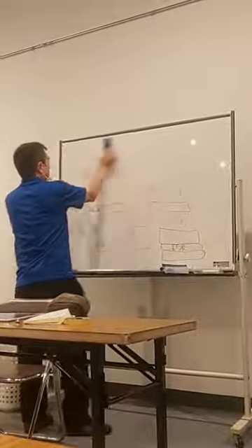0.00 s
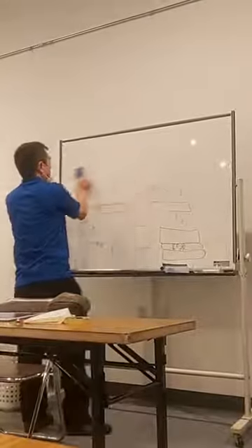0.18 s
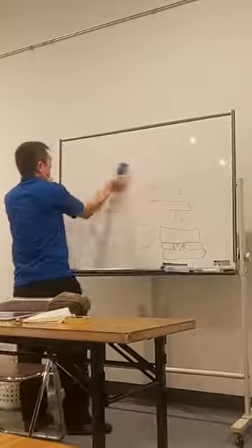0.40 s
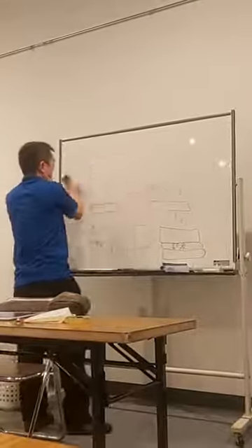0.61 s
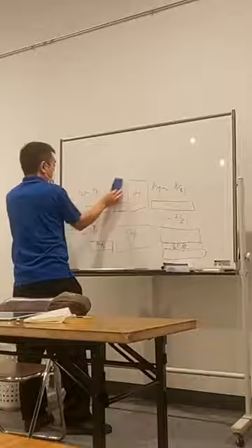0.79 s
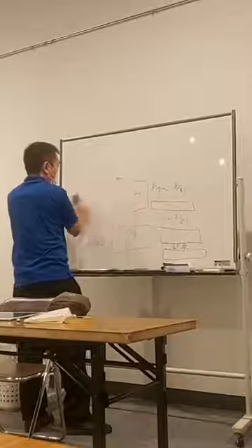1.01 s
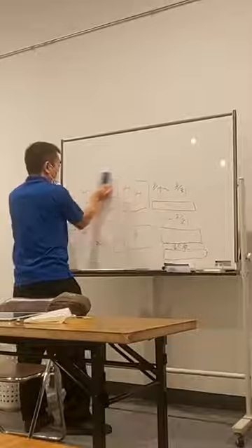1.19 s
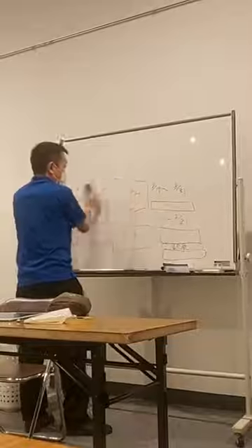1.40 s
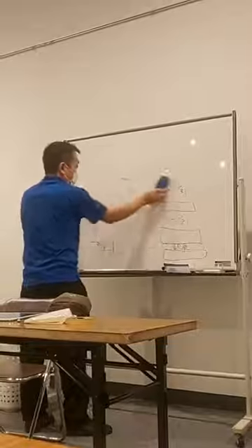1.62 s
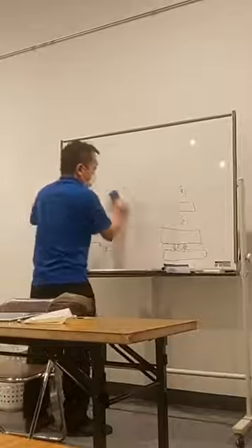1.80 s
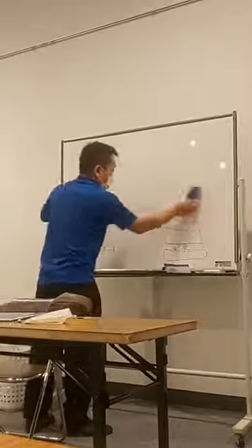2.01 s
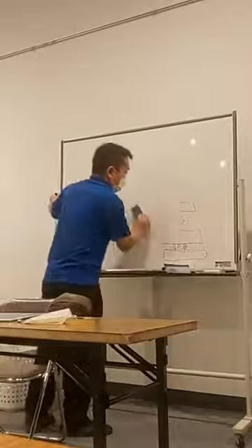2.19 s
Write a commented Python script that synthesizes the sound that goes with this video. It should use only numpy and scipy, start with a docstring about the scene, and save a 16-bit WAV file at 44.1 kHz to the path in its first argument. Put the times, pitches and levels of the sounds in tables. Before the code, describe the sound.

A whiteboard eraser squeaks as it rubs back and forth. Over soft, fluctuating felt hiss, thin, raspy, very high squeals of about a tenth of a second or less come near 0.2, 0.6, 0.95 and 1.3 seconds, the first dropping in pitch. Light knocks fall around 0.75, 0.9 and 2.1. After 1.4 only rubbing and faint chirps remain. The bare room rings briefly over low ventilation rumble.

```python
"""In a quiet meeting room an eraser is rubbed back and forth over a whiteboard.
The felt is coloured noise whose level rises and falls; it catches in short squeals, mostly near 9 kHz, made of
trembling sines that beat and rasp as they roughen. Faint chirps, bright scratches and low bumps join in.
Light knocks are decaying sines and a noise tick. Squeals, chirps, scratches and knocks ring on in the bare room;
ventilation rumbles, hums and hisses."""
import sys
import numpy as np
from scipy import signal
from scipy.fft import rfft, irfft, next_fast_len
from scipy.io import wavfile

SR = 44100
rng = np.random.default_rng(int(sys.argv[2]) if len(sys.argv) > 2 else 0)


def output_pcm(signal):
    """Save a mono or channel-first signal as 16-bit PCM at the path in sys.argv[1].

    Samples are clipped to [-1, 1] before scaling.
    """
    pcm = np.clip(np.atleast_2d(signal).T, -1, 1) * 32767
    wavfile.write(sys.argv[1], SR, np.round(pcm).astype(np.int16))


N = 97020
LEAD_S = 0.2   # computed ahead of the audible part, so the room is already sounding
TIME = np.arange(-int(LEAD_S * SR), N) / SR


def from_db(db):
    """Level in dB to amplitude factor."""
    return 10 ** (np.asarray(db) / 20)


def rms_one(x):
    """Scale a signal to rms 1."""
    return x / np.sqrt(np.mean(x ** 2) + 1e-20)


def drift(rate_hz):
    """Slow random wander: white noise through two equal one-pole lowpasses, rms 1."""
    pole = np.exp(-2 * np.pi * rate_hz / SR)
    white = rng.standard_normal(len(TIME) + SR)
    wander = signal.lfilter([1], [1, -2 * pole, pole * pole], white)
    return rms_one(wander[SR:])   # drop the filter's first second


def noise(spectrum):
    """Noise shaped by (Hz, dB per Hz) points, falling away past both ends; rms 1."""
    hz, db = np.transpose(spectrum)
    size = next_fast_len(len(TIME))
    f = np.maximum(np.fft.rfftfreq(size, 1 / SR), 1)
    colour = from_db(np.interp(np.log(f), np.log(hz), db))
    low_end = np.minimum(1, f / hz[0]) ** 2
    high_end = np.minimum(1, hz[-1] / f) ** 2
    white = rfft(rng.standard_normal(size))
    return rms_one(irfft(white * colour * low_end * high_end, size)[:len(TIME)])


def level_curve(points):
    """Join (seconds, level) points with straight lines."""
    return np.interp(TIME, *np.transpose(points))


def swell(start, length):
    """A rounded rise and fall of height 1."""
    return np.sin(np.pi * np.clip((TIME - start) / length, 0, 1))


def tone(pitch_hz, jitter_hz):
    """A sine whose pitch trembles at random, by no more than the jitter either way; rms 1."""
    jitter_rate_hz = 190
    pitch = pitch_hz + jitter_hz * np.tanh(drift(jitter_rate_hz))
    return np.sqrt(2) * np.sin(2 * np.pi * np.cumsum(pitch) / SR)


def squeals():
    """Stick-slip tones: with roughness the pitch trembles, a second patch of felt beats and a rasp grows."""
    # One curve per squeal; the first stroke starts high and breaks to a lower note.
    # Each row: time in seconds, pitch in Hz, level in dB before the mix, roughness (about 0 to 1).
    squeal_curves = [
        [(.195, 10000, -36, 0.26), (.2, 9910, -26.5, 0.37), (.215, 9925, -29.5, 0.65), (.226, 9700, -48, 0.8)],
        [(.209, 9360, -39, 1), (.226, 9164, -29.5, 1.11), (.24, 9016, -29.5, 0.35), (.252, 9070, -29.5, 0.34),
         (.264, 9050, -43, 0)],
        [(.536, 9130, -45, 0.15), (.546, 9230, -38, 0.2), (.554, 9160, -31, 0.21), (.567, 9240, -37, 0.4),
         (.582, 9350, -33.5, 0.48), (.602, 9115, -30, 0.61), (.62, 9146, -30, 0.66), (.642, 8893, -34, 0.46),
         (.658, 9010, -46, .4)],
        [(.909, 9000, -41.5, 0.06), (.928, 9220, -37.5, 0.11), (.943, 9190, -44, 0.31), (.949, 9310, -32, 0.66),
         (.96, 9210, -35.5, 0.98), (.968, 9217, -27.5, 0.87), (.992, 9076, -32, 0.44), (1.008, 8910, -40, 0.4)],
        [(1.247, 9190, -38, 0.19), (1.263, 9260, -37, 0.39), (1.275, 9440, -36.5, 0.53),
         (1.287, 9324, -27, .85), (1.303, 9240, -29.5, .7), (1.32, 9010, -32.5, 0.6), (1.35, 9140, -38, 0.5)],
    ]
    # Friction noise around the squeal. Each row: frequency in Hz, relative level in dB per Hz.
    rasp_colour = [(8200, -28.5), (8650, -15), (8900, 4.5), (9450, 9.5), (9700, 7), (10000, -15.5),
                   (10250, -34), (11200, -63), (11700, -51)]
    edge_s = 0.0044   # the felt catches and lets go this fast
    # At roughness 1: pitch tremble, the second patch's offset above the first, and both added levels.
    jitter_hz, second_offset_hz, second_db, rasp_db = 172, 173.3, -16, -10

    out, rasp = np.zeros(len(TIME)), noise(rasp_colour)
    for curve in squeal_curves:
        s, *columns = np.transpose(curve)
        pitch, db, rough = (np.interp(TIME, s, column) for column in columns)
        gate = np.clip(np.minimum(TIME - s[0], s[-1] - TIME) / edge_s, 0, 1)
        first = tone(pitch, rough * jitter_hz)
        second = tone(pitch + rough * second_offset_hz, rough * jitter_hz)
        body = first + rough * from_db(second_db) * second
        body += rough ** 2 * from_db(rasp_db) * rasp
        out += gate * from_db(db) * body
    return out


def chirps():
    """Faint, nearly steady whistles where the felt only just catches."""
    # Each row: start in seconds, length in seconds, level in dB before the mix, pitch in Hz.
    chirp_events = [(-.05, 0.065, -50, 9222), (0.065, 0.033, -62, 9240), (0.207, 0.048, -70, 4580),
                    (0.56, 0.041, -66.5, 4610), (0.696, 0.047, -65, 4550), (1.166, 0.033, -68, 4750),
                    (1.777, 0.039, -58, 7125), (1.746, .12, -72, 13700)]
    jitter_hz = 75.6
    return sum(from_db(db) * swell(start, length) * tone(hz, jitter_hz)
               for start, length, db, hz in chirp_events)


def scrapes():
    """A bright scratch of band-shaped noise as the felt grabs the board."""
    # Each row: start in seconds, length in seconds, level in dB before the mix.
    scrape_events = [(0.167, .035, -58.5), (0.19, 0.025, -42.5), (0.933, 0.029, -58), (1.255, 0.03, -53)]
    # Colour of the scratch. Each row: frequency in Hz, relative level in dB per Hz.
    scrape_colour = [(9500, -27), (10200, 10.5), (10700, -2), (11250, -1.5), (11550, -28), (12500, -40)]
    envelope = sum(from_db(db) * swell(start, length) for start, length, db in scrape_events)
    return envelope * noise(scrape_colour)


def rubbing():
    """Grainy friction hiss of felt over the hollow rub of the panel, sharing one random flutter."""
    # Felt rubbing on the board. Each row: time in seconds, level in dB.
    felt_level = [(0, -62), (.08, -61.5), (.16, -63), (.215, -59), (.27, -64), (.34, -63.5), (.43, -62.5),
                  (.52, -65), (.59, -61.5), (.67, -64.5), (.76, -61), (.86, -62.5), (.95, -63),
                  (1.01, -61.5), (1.1, -63), (1.18, -60), (1.23, -62.5), (1.32, -61.5), (1.375, -57.5),
                  (1.46, -61.5), (1.68, -64.5), (1.82, -65), (1.87, -62.5), (1.96, -61), (2.04, -65),
                  (2.14, -63), (2.2, -64.5)]
    # Colour of the felt. Each row: frequency in Hz, relative level in dB per Hz.
    felt_colour = [(500, -0.5), (1500, -6.5), (2200, -9), (2800, -5), (3500, -3.5), (4050, 2), (4600, -2.5),
                   (5550, 8.5), (6200, 0.5), (6800, -11), (8000, -9), (10000, -3), (12400, -3),
                   (13400, -10.5), (14300, -30)]
    # The board's own resonance under the felt. Each row: time in seconds, level in dB.
    panel_level = [(0, -66.5), (.08, -65.5), (.15, -71), (.24, -66), (.36, -70.5), (.5, -69), (.68, -74),
                   (.8, -68.5), (.88, -68), (1.0, -73.5), (1.12, -68.5), (1.18, -64.5), (1.26, -71.5),
                   (1.38, -68.5), (1.46, -70.5), (1.75, -76), (2.2, -73.5)]
    # Colour of the panel. Each row: frequency in Hz, relative level in dB per Hz.
    panel_colour = [(300, 0.5), (750, -11), (1050, -0.5), (1300, 2), (1580, 6.5), (1800, -0.5), (2050, -12),
                    (3000, -20)]

    grain_depth_db, grain_rate_hz = 0.95, 21
    grain_db = grain_depth_db * drift(grain_rate_hz)
    felt = from_db(level_curve(felt_level) + grain_db) * noise(felt_colour)
    panel = from_db(level_curve(panel_level) + grain_db) * noise(panel_colour)
    return felt + panel


def flexing():
    """The board flexes under the hand: faint low bumps of noise."""
    # Each row: centre in seconds, level in dB.
    bumps = [(0.02, -58.5), (1.14, -60.5), (1.55, -62)]
    # Colour of the bumps. Each row: frequency in Hz, relative level in dB per Hz.
    bump_colour = [(32, -26), (45, -20), (70, -17), (100, 3), (140, -4.5), (250, -25.5)]
    half_length_s = 0.05
    envelope = sum(from_db(db) * np.exp(-((TIME - s) / half_length_s) ** 2) for s, db in bumps)
    return envelope * noise(bump_colour)


def knocks():
    """Light blows: a tock from the damped board's modes, a tick and a short ring from the eraser's shell."""
    # The eraser knocks on the board. Each row: start in seconds, tock, tick and ring levels in dB.
    knock_events = [(0.067, -64, -61, -56), (0.751, -55.5, -57, -68), (0.911, -50.5, -54.5, -62),
                    (1.138, -65, -64, -72), (2.124, -60, -53, -68)]
    # Modes of the board. Each row: frequency in Hz, level in dB relative to the tock, t60 in seconds.
    board_modes = [(400, -12, .04), (990, -2, .04), (1110, -3, .03), (1270, -3, .03), (1420, 0, .025),
                   (1620, -2, .028)]
    # Tick of the eraser's shell. Each row: frequency in Hz, relative level in dB per Hz.
    shell_colour = [(2000, -20), (3200, -9), (4200, 1), (5000, -4), (6300, -1), (7500, -8), (13000, -16)]
    contact_s, tick_t60_s = 0.00063, 0.015   # rise and decay of the tick
    ring_hz, ring_t60_s = 4215, 0.058

    out, tick = np.zeros(len(TIME)), noise(shell_colour)
    for start, tock_db, tick_db, ring_db in knock_events:
        age = np.maximum(TIME - start, 0)
        for k, (hz, db, t60) in enumerate(board_modes):
            sign = (-1) ** k   # neighbouring modes start in opposite directions
            out += sign * from_db(tock_db + db - 60 * age / t60) * np.sin(2 * np.pi * hz * age)
        rise = np.minimum(age / contact_s, 1)
        out += rise * from_db(tick_db - 60 * age / tick_t60_s) * tick
        out += from_db(ring_db - 60 * age / ring_t60_s) * np.sin(2 * np.pi * ring_hz * age)
    return out


def room(x):
    """Sparse early reflections off the hard walls and a smooth, longer noise tail, both decaying."""
    early_t60_s, late_t60_s, first_echo_s = 0.28, 0.65, 0.00092
    early_db, late_db, reflections_per_s = -2.5, -7.5, 900
    t = np.arange(SR) / SR
    early = rng.standard_normal(SR) * (rng.random(SR) < reflections_per_s / SR)
    early *= from_db(-60 * t / early_t60_s) * (t > first_echo_s)
    late = rng.standard_normal(SR) * from_db(-60 * t / late_t60_s) * (t > 2 * first_echo_s)
    response = from_db(early_db) * early / np.linalg.norm(early)
    response += from_db(late_db) * late / np.linalg.norm(late)
    return signal.fftconvolve(x, response)[:len(x)]


def ventilation():
    """Low rumble and faint hiss of shaped noise, with hum tones whose phases waver."""
    # Rumble of the air. Each row: frequency in Hz, relative level in dB per Hz.
    air_colour = [(30, -2), (42, -7), (58, 3.5), (85, 0), (115, -2), (150, -6.5), (195, -4), (290, -10),
                  (370, -18), (500, -19.5), (730, -34.5), (900, -26.5)]
    # Hum tones. Each row: frequency in Hz, level in dB.
    hum_tones = [(68, -75.5), (100, -65), (199, -74.5)]
    # Hiss of the air. Each row: frequency in Hz, relative level in dB per Hz.
    hiss_colour = [(200, 2), (900, -3), (1600, -0.5), (2200, -14.5), (6000, -7), (14000, -34)]
    rumble_db, hiss_db = -61.5, -75
    waver_rad, waver_rate_hz = 0.94, 3.16

    hum = np.zeros(len(TIME))
    for hz, db in hum_tones:
        phase = 2 * np.pi * hz * TIME + waver_rad * drift(waver_rate_hz)
        hum += from_db(db) * np.sqrt(2) * np.sin(phase)
    return from_db(rumble_db) * noise(air_colour) + hum + from_db(hiss_db) * noise(hiss_colour)


def scene():
    """Mix the direct eraser, the room's answer to its squeals and knocks, and the ventilation."""
    squeal_direct_db, knock_room_db = -4.5, -6
    squeal = squeals() + chirps() + scrapes()
    knock = knocks()
    direct = from_db(squeal_direct_db) * squeal + knock + rubbing() + flexing()
    reverb = room(squeal + from_db(knock_room_db) * knock)
    mix = direct + reverb + ventilation()
    return mix[None, -N:]   # leave out the lead-in


def record(dry):
    """A steep elliptic lowpass cuts the top."""
    cutoff_hz = 14300
    lowpass = signal.ellip(10, 0.2, 70, cutoff_hz, fs=SR, output="sos")   # order, ripple dB, stopband dB
    return signal.sosfilt(lowpass, dry)


dry = scene()
out = record(dry)
output_pcm(out)
```